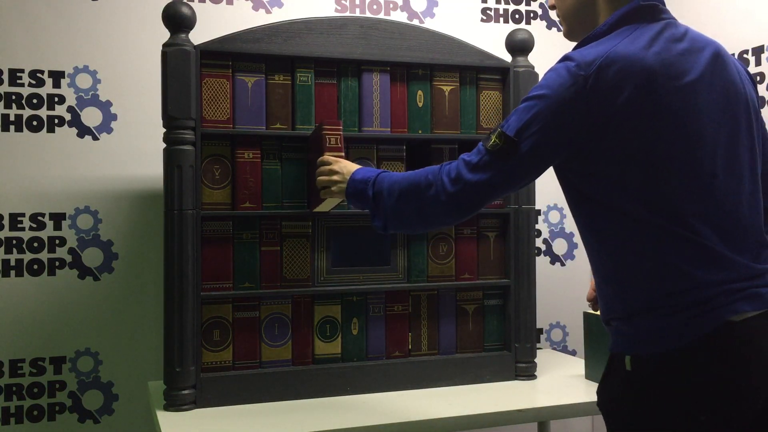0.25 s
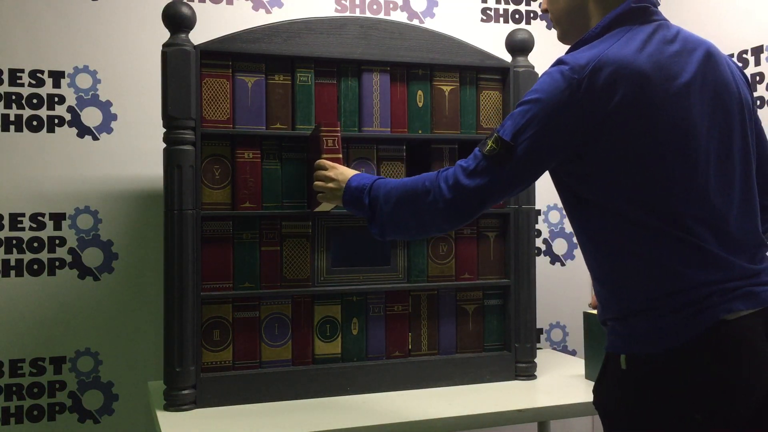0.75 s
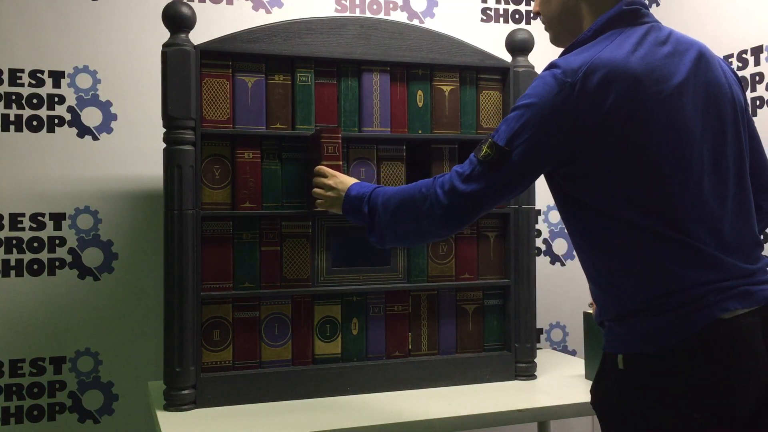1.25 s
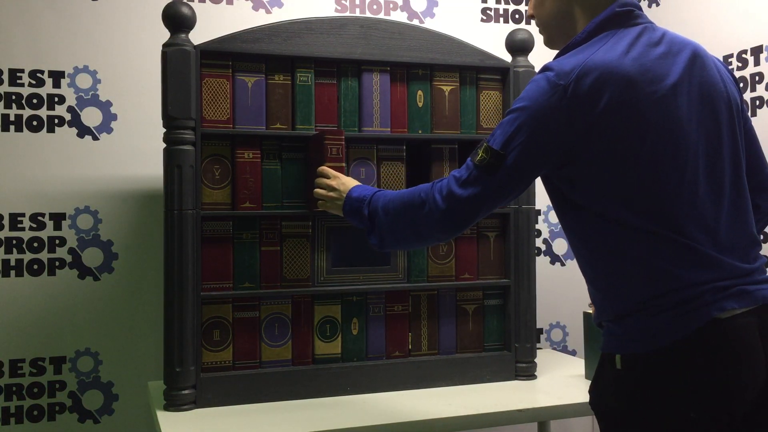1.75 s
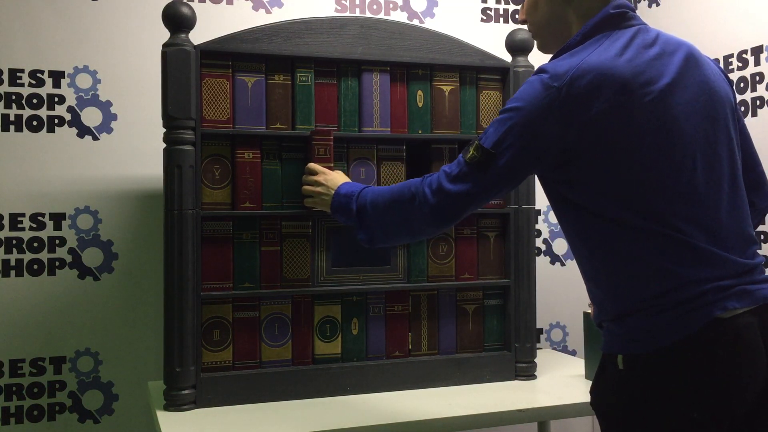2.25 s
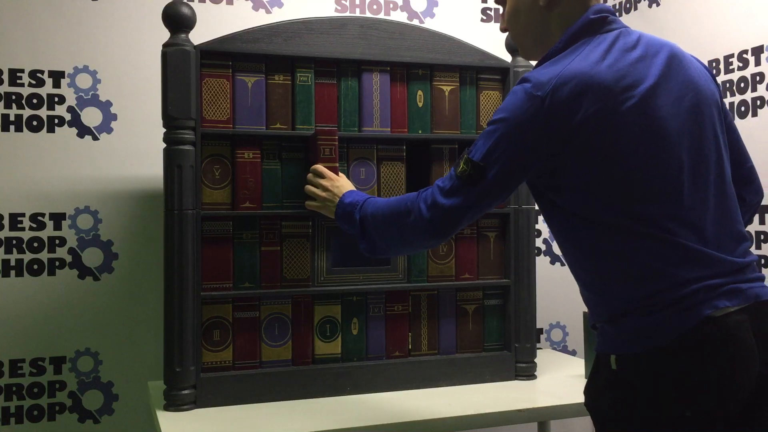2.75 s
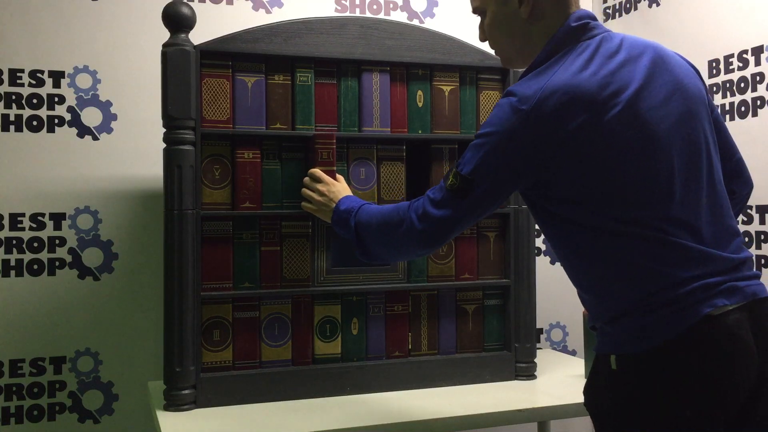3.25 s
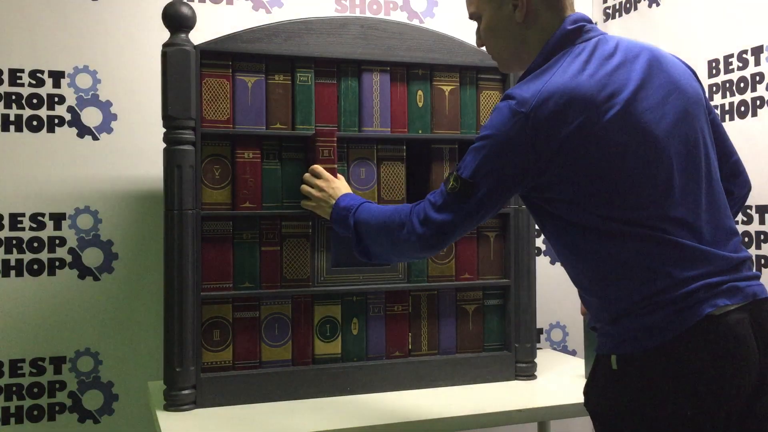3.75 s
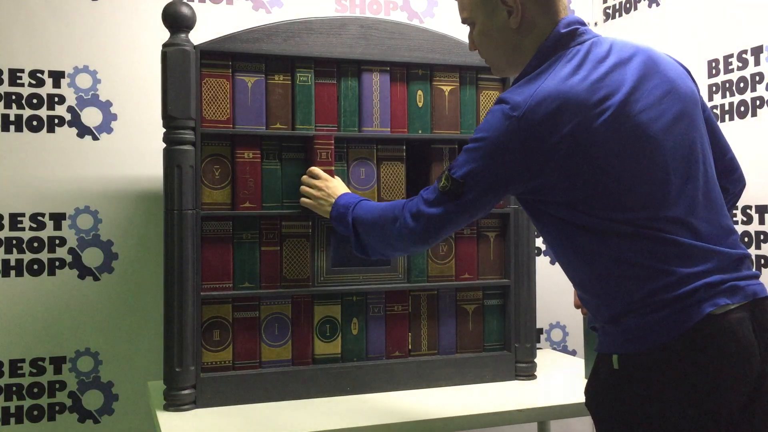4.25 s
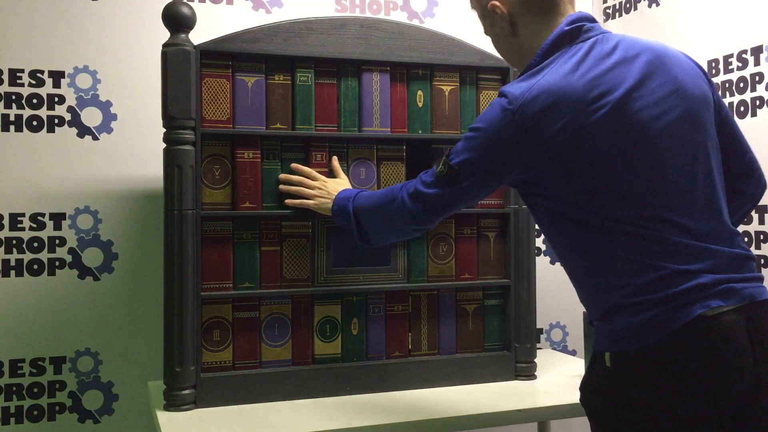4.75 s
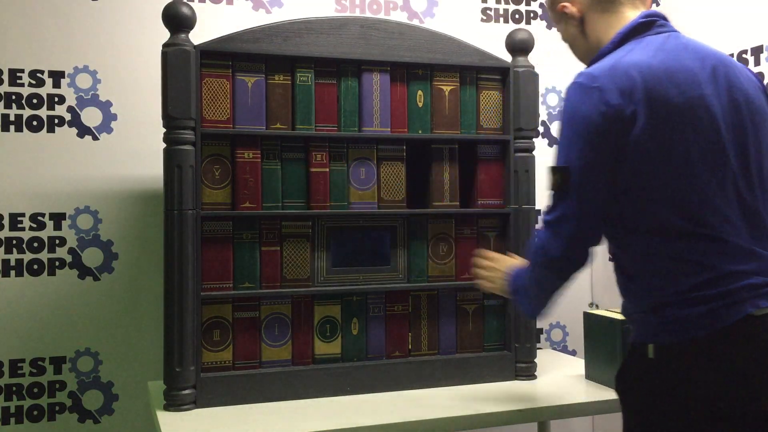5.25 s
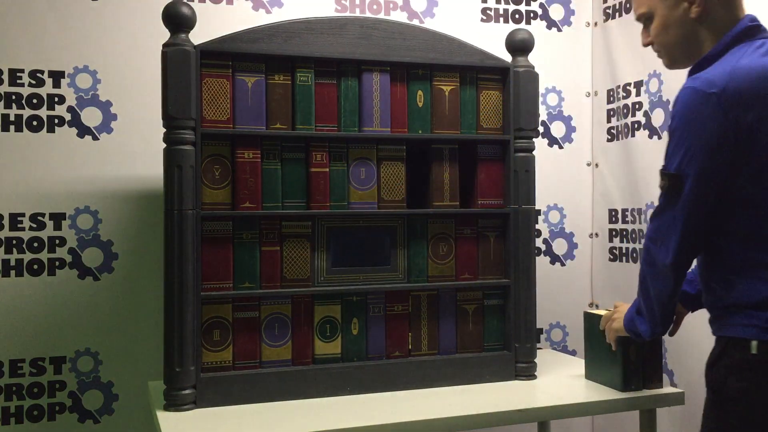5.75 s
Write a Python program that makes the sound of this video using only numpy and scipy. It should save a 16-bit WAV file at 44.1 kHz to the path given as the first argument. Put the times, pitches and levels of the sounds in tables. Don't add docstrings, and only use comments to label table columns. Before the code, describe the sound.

A close mono microphone in a bare, ringing room, with a faint low air floor. At about 0.15 s a heavy book knocks a wooden bookcase, followed at once by a deep hollow bump and a low table thud. A softer bump comes near 0.6 s, then a quiet gap. At 1.3 s a short scrape leads to a bright knock at 1.4 s and a small jerk around 1.6 s. Faint contacts near 2.0 s precede a hard, sharp clack at 2.4 s. Two light taps and a small rub come around 3.05-3.3 s, then another hard clack at 3.75 s. From 4.1 to 4.7 s the book slides home in rumbling, scraping jerks with hollow bumps and table sway, finished by a firm knock at 4.7 s. Echoes fade; a faint papery brush follows at 5.0-5.25 s. From 5.7 s a box drags with a drier, hissier scrape and bright little knocks near 5.9 s.

```python
import sys
import numpy as np
from scipy import signal
from scipy.fft import rfft, irfft
from scipy.io import wavfile
from scipy.ndimage import uniform_filter1d

SR = 44100
rng = np.random.default_rng(int(sys.argv[2]) if len(sys.argv) > 2 else 0)


def wav_out(sig):
    wavfile.write(sys.argv[1], SR, np.round(np.clip(np.atleast_2d(sig).T, -1, 1) * 32767).astype(np.int16))


def ratio(d):
    e = np.asarray(d, float) / 20
    return 10 ** e


N = 264159


def evened(x):
    return x / np.sqrt(np.mean(x ** 2) + 1e-20)


def read(points, hz, column=1):
    rows = np.transpose(points)
    return np.interp(np.log(hz + 1), np.log(rows[0] + 1), rows[column])


def add(mix, s, sound):
    part = mix[max(round(s * SR), 0):][:len(sound)]
    part += sound[:len(part)]


def coloured(x, spectrum):
    hz = np.fft.rfftfreq(len(x), 1 / SR)
    return evened(irfft(rfft(x) * ratio(read(spectrum, hz)), len(x)))


def passed(x, hz, order=2):
    return signal.sosfilt(signal.butter(order, hz, "high", fs=SR, output="sos"), x)


def ring(modes, widen=0.82):
    t = np.arange(6000) / SR
    tones = np.zeros(len(t))
    for hz, width, db in modes:
        tones += ratio(db) * width * np.exp(-np.pi * width * widen * t) * np.sin(2 * np.pi * hz * t)
    return tones / np.linalg.norm(tones)


def clatter(db, bright_db):
    # frequency in Hz, level in dB
    clack = [(60, -57), (150, 0), (350, 4), (800, -5), (1500, -14.5), (2500, -23.5), (4000, -34.5),
             (8000, -68)]
    hz = np.fft.rfftfreq(2048, 1 / SR)
    tilt_db = bright_db * np.log2(np.clip(hz, 300, 6000) / 900)
    log_colour = np.log(ratio(read(clack, hz) + tilt_db))
    fold = irfft(log_colour) * np.r_[1, 2 * np.ones(1023), 1, np.zeros(1023)]
    click = irfft(np.exp(rfft(fold)))
    return ratio(db) * click / np.linalg.norm(click)


def blows():
    # time in seconds, ring in dB, clatter in dB,
    # brightness in dB per octave, crack in dB
    hits = [
        (0.152, -13.5, -34.5, -5.5, -63),
        (1.408, -20.5, -27, 7.5, -64.5),
        (2.4326, -18, -13.5, 5.5, -59),
        (3.05, -27.5, -40, -2.5, -76),
        (3.077, -27, -39, 4.5, -89),
        (3.7637, -18, -15.5, 0.5, -57),
        (4.253, -29.5, -53, -11, -84),
        (4.713, -28, -15.5, 2, -61),
    ]
    # frequency in Hz, width in Hz, level in dB
    parts = [
        [(335, 940, -8.5), (600, 194, -5), (950, 790, -3.5), (1450, 330, -2), (2460, 370, -29)],
        [(315, 360, 5), (560, 320, 0.5), (640, 280, 0.5), (950, 89, -9.5), (1760, 2000, -20.5),
         (3030, 120, -21.5)],
        [(338, 200, -2.5), (700, 100, -8), (914, 25, -29.5), (992, 110, 9), (1575, 48, 0), (1592, 82, 1),
         (2384, 150, -14.5), (2866, 126, -11)],
        [(520, 36, 0), (700, 170, -1.5), (950, 25, 3)],
        [(330, 36, 31.5), (723, 140, 25.5), (980, 23, -6), (2200, 220, -29)],
        [(386, 240, -5), (694, 27.5, 8.5), (1138, 390, -3), (1370, 330, -24.5), (1960, 730, -14)],
        [(553, 52, 4.5), (900, 300, -1.5), (1230, 240, -3)],
        [(293, 93, 18), (416, 340, -4.5), (700, 93, 1.5), (1150, 63, 6.5), (2430, 270, -15)],
    ]
    # frequency in Hz, level in dB
    crack = [(1500, 1.5), (4000, 4.5), (7000, 4), (10000, -10), (13000, -9), (16000, -14.5)]
    mix, edges = np.zeros((2, N))
    fade = np.exp(-np.arange(1500) / SR / 0.0011)
    pad = signal.butter(2, 2600, fs=SR, output="sos")
    for (s, ring_db, clatter_db, bright_db, crack_db), modes in zip(hits, parts):
        wood = signal.sosfilt(pad, passed(ring(modes), 190))
        add(mix, s, ratio(ring_db + 15.5) * wood)
        add(mix, s, clatter(clatter_db + 4.5, bright_db))
        snap = fade * coloured(rng.standard_normal(len(fade)), crack)
        add(edges, s, ratio(crack_db + 13.5) * snap)
    return mix, edges


def slot(x):
    # delay in ms, share of the sound
    bounces = [(0, 0.35), (1.3, 0.72), (2.2, -0.054), (3.7, 0.61), (5.2, -0.33), (7.1, 0.045)]
    taps = np.zeros(600)
    for ms, share in bounces:
        taps[int(ms * SR / 1000)] += share
    return signal.oaconvolve(x, taps)[:N]


def bumps(rows):
    mix = np.zeros(N)
    k = np.arange(900)
    for s, hum_db, hz, ms, clatter_db in rows:
        bright_db = -4 + 5.5 * np.log2(hz / 500)
        u = np.arange(5000) / SR / (np.clip(ms, 6, 60) / 3000)
        waver = 1 + 0.025 * evened(uniform_filter1d(rng.standard_normal(len(u)), 250))
        hum = u * np.exp(1 - u) * np.sin(2 * np.pi * np.cumsum(hz * waver) / SR)
        add(mix, s - 0.002, ratio(hum_db - 7.5) * hum)
        smear = rng.standard_normal(900) * np.exp(-k / 200) * np.minimum(k / 50, 1)
        clack = clatter(clatter_db + 19.5, bright_db)
        add(mix, s, signal.fftconvolve(clack, smear / np.linalg.norm(smear)))
    return mix


def slides():
    # start in seconds, length in seconds,
    # rasp in dB, hiss in dB, swell from start to end in dB
    strokes = [(0.138, 0.032, -51, -66.5, 7.5), (3.753, 0.021, -48, -72.5, 7), (1.29, .11, -51, -74, 19.5),
               (2.25, 0.11, -61, -80.5, 1), (3.042, 0.05, -53.5, -75.5, -5.5),
               (3.106, 0.053, -56.5, -79, -3), (3.195, 0.074, -64.5, -77, 1), (3.445, .035, -61.5, -81, -4),
               (4.158, 0.106, -44, -74.5, 9), (4.236, .24, -44.5, -83.5, -3.5),
               (4.453, .265, -50.5, -73, 3.5), (5.017, 0.13, -83, -72, -5.5), (5.16, 0.099, -93.5, -70, 8),
               (5.69, 0.11, -50, -54.5, 24.5), (5.787, 0.12, -53.5, -51.5, 6.5),
               (5.883, .105, -52, -61, -13)]
    # time in seconds, level in dB
    jerks = [(.006, -59), (.145, -44.5), (2.048, -47), (1.31, -55), (1.37, -57), (1.405, -42.5),
             (1.586, -40.5), (1.619, -44), (2.361, -43.5), (2.423, -53), (3.104, -37), (3.25, -59.5),
             (4.15, -39), (4.261, -32.5), (4.325, -28.5), (4.53, -37), (4.61, -52), (4.682, -39),
             (5.784, -47.5), (5.9, -53)]
    # frequency in Hz, width in Hz, level in dB
    case = [(347, 100, -5), (695.4, 12, -5.5), (953, 56, -14)]
    # frequency in Hz, level in dB per Hz
    rasp_colour = [(530, 0), (900, -5.5), (1430, -11), (1620, -7.5), (2650, -21), (2870, -19),
                   (6140, -33.5), (8000, -61), (10400, -82), (17600, -120)]
    # frequency in Hz, level in dB per Hz
    hiss_colour = [(1470, -45), (2500, -2.5), (2760, -13.5), (2980, -5), (3270, -10.5), (3470, -10),
                   (6110, -11), (15500, -22.5)]
    grip_db_per_s, slip_db_per_s = 449, 207
    grit_per_s = 2500
    edge_share = 0.26

    t = np.arange(N) / SR
    slips, grit, fuzz, catch = rng.standard_normal((4, N))
    catch = ratio(2.4 * evened(uniform_filter1d(catch, 130)))
    grit = grit * (rng.random(N) < grit_per_s / SR)
    rumble, rasp, hiss = np.zeros((3, N))
    for s, db in jerks:
        drop_db = np.maximum(grip_db_per_s * (s - t), slip_db_per_s * (t - s))
        rumble = np.maximum(rumble, ratio(db - drop_db))
    for s, length, rasp_db, hiss_db, swell_db in strokes:
        u = np.linspace(0, 1, round(length * SR))
        swell = ratio(swell_db * (u - (swell_db > 0)))
        stroke = swell * signal.windows.tukey(len(u), edge_share)
        add(rasp, s, ratio(rasp_db) * stroke)
        add(hiss, s, ratio(hiss_db) * stroke)
    shaken = signal.fftconvolve(rumble * catch * slips, ring(case, widen=1.66))[:N]
    rasping = rasp * catch ** 1.8 * coloured(grit, rasp_colour)
    hissing = hiss * catch ** 1.7 * coloured(fuzz, hiss_colour)
    return ratio(-9.5) * shaken + ratio(-6.5) * rasping + ratio(-3.0) * hissing


def sways():
    # strongest swing in seconds, level in dB,
    # frequency in Hz, length in ms
    pushes = [(0.037, -45, 196, 8.8), (0.248, -36.5, 147, 90), (0.294, -31, 191, 10.5),
              (0.474, -43.5, 161, 24), (0.634, -44, 177, 70), (0.693, -37.5, 222, 11.3),
              (0.855, -49.5, 161.7, 26), (1.177, -48.5, 169, 26), (1.477, -40, 170.3, 97),
              (1.618, -44.5, 192, 48), (2.088, -41, 171, 16), (2.328, -48.5, 180, 22),
              (2.485, -42.5, 170, 45), (3.102, -43, 196, 62), (3.175, -43.5, 175, 38),
              (3.317, -50, 208, 24), (3.475, -51, 168.3, 45), (3.792, -43.5, 181.8, 72),
              (3.839, -35.5, 170, 11.4), (4.171, -37, 165.6, 26), (4.322, -31.5, 186, 5.3),
              (4.384, -35.5, 170, 18), (4.447, -40, 166.5, 83), (4.591, -33.5, 177.7, 43),
              (4.755, -42, 212.2, 97), (4.829, -47.5, 174, 52), (5.8, -40, 170, 32), (5.902, -46, 181, 31),
              (5.952, -44.5, 174, 17)]
    # frequency in Hz, level in dB
    legs = [(76, 3), (122, 6.5)]
    mix = np.zeros(N)
    t = np.arange(-0.08, 0.16, 1 / SR)
    lean = np.where(t < 0, 1.35, 0.8) * t
    for s, db, hz, ms in pushes:
        deep_db = db - 22.5 + 0.1433 * ms
        swing = np.exp(-(1500 * lean / ms) ** 2) * np.sin(2 * np.pi * hz * t)
        shake = sum(ratio(d) * np.sin(2 * np.pi * (f * t + rng.random())) for f, d in legs)
        shake = np.exp(-(lean / 0.042) ** 2) * shake
        skip = max(round((0.08 - s) * SR), 0)
        add(mix, s - 0.08, (ratio(db - 1.0) * swing + ratio(deep_db - 8.0) * shake)[skip:])
    return mix


def room(x):
    # frequency in Hz, t60 in seconds, build-up in seconds, early burst in dB
    bands = [(72.5, 0.21, 0.15, -6), (170, 1.33, 0.021, 2), (400, 1.39, 0.0091, 13.5),
             (1000, 1.534, 0.014, 14.5), (1730, 1.21, 0.00063, 11), (2860, 1.28, 0.0013, 9.5),
             (5600, 0.31, 0.0019, 13), (10000, 0.29, 0.0025, 11)]
    size, out = 60000, np.zeros(N)
    hz, t = np.fft.rfftfreq(size, 1 / SR), np.arange(size) / SR
    for place in range(3):
        taps, tail = np.zeros((2, size))
        spots = np.arange(0, size, 15) + rng.integers(0, 15, size // 15)
        taps[spots] = rng.choice([-1., 1.], size // 15)
        for k, (_, t60, rise, early_db) in enumerate(bands):
            share = read([(row[0], j == k) for j, row in enumerate(bands)], hz)
            build = 1 - np.exp(-(t / rise) ** 2)
            early = 1 + (ratio(early_db) - 1) * np.exp(-(t / 0.03) ** 2)
            tail += irfft(rfft(taps) * share, size) * build * early * ratio(-60 * t / t60)
        turn = np.sqrt(2 / 3) * np.cos(2 * np.pi * (np.arange(N) / SR * 9 + place / 3))
        out += signal.fftconvolve(x * turn, tail / np.linalg.norm(tail))[:N]
    return out


def air():
    # frequency in Hz, level in dB per Hz
    still = [(15, -44.5), (25, -15), (107, -0.5), (188, -11.5), (457, -14.5), (762, -19.5), (848, -19),
             (1200, -24.5), (1380, -24.5), (1490, -23), (1620, -24), (1900, -22.5), (2060, -24),
             (3630, -26), (15500, -36.5)]
    frames, hz = N // 256 + 5, np.fft.rfftfreq(1024, 1 / SR)
    a, b, patches = rng.standard_normal((frames, 513, 3)).T
    patches = evened(uniform_filter1d(uniform_filter1d(patches, 12, 0), 14, 1))
    z = (a + 1j * b) * ratio(read(still, hz)[:, None] + 0.31 * patches)
    return ratio(-65) * evened(signal.istft(z, nperseg=1024, noverlap=768)[1][:N])


def scene():
    # time in seconds, hum in dB,
    # panel frequency in Hz, hum length in ms, clatter in dB; the next two tables have the same columns
    soft_bumps = [(0.043, -40.5, 363, 9.7, -80), (0.179, -30.5, 755, 7.9, -30),
                  (0.194, -17, 303.7, 22, -32.5), (0.602, -34.5, 584, 16, -33),
                  (1.13, -56.5, 491, 41, -49.5), (1.316, -55, 1310, 27, -55.5),
                  (1.343, -47.5, 479, 16, -63.5), (1.442, -25, 485, 11.3, -49), (1.583, -35, 465, 18, -59),
                  (2.033, -52, 280, 5.9, -38), (3.229, -39, 379, 30, -52), (4.101, -36.5, 375, 24, -33),
                  (4.315, -20.5, 380, 30, -37.5), (4.389, -35, 377, 25, -43),
                  (4.476, -34.5, 383, 72, -29.5), (4.515, -34, 900, 6.7, -37.5), (4.534, -36, 700, 6, -26),
                  (4.556, -47, 790, 13.5, -56), (4.719, -29.5, 333, 20, -24)]
    touches = [(.012, -52.5, 520, 51, -53.5), (1.59, -47, 700, 36, -50), (2.35, -38.5, 746, 25, -46.5),
               (2.354, -30.5, 568, 25, -59), (3.056, -51, 1630, 13, -55), (3.085, -43, 1570, 14, -60),
               (.603, -38, 400, 30, -51), (2.04, -48.5, 565, 25, -47), (2.222, -47.5, 816, 24, -59.5),
               (3.30, -50, 900, 40, -48.5), (3.451, -37.5, 902, 13, -56.5)]
    box_knocks = [
        (5.757, -48, 690, 16, -68),
        (5.774, -48.5, 1465, 41, -48),
        (5.778, -38.5, 400, 12, -50),
        (5.888, -33, 2104, 19, -40.5),
        (5.890, -39, 950, 13, -63),
        (5.901, -31, 2060, 8.3, -37.5),
        (5.903, -39.5, 880, 17, -59),
        (5.914, -41, 900, 9.4, -48),
        (5.93, -46, 1970, 10, -47),
    ]
    hard, edges = blows()
    soft = bumps(soft_bumps) + slides()
    near = bumps(touches)
    box = bumps(box_knocks)
    low = sways()
    to_walls = ratio(-3.5) * edges + ratio(4.5) * hard + ratio(0.5) * soft
    to_walls += ratio(-8.5) * near + ratio(-6.5) * box + ratio(-1.5) * low
    direct = slot(hard + edges) + soft + near + box + low
    return passed(direct + room(to_walls), 71, order=3)[None] + passed(air(), 53)[None]


def band_limit(x):
    return signal.sosfilt(signal.butter(12, 15660, fs=SR, output="sos"), x)


def record(dry):
    depth_db, from_db, span_db = 5, 3, 12.5
    z = signal.stft(dry, nperseg=512, noverlap=384)[2]
    power = uniform_filter1d(uniform_filter1d(abs(z) ** 2, size=9, axis=1), size=9, axis=2)
    power_db = 10 * np.log10(power + 1e-16)
    over_db = power_db - np.percentile(power_db, 12, axis=2, keepdims=True)
    z = z * ratio(-depth_db * np.clip(1 - (over_db - from_db) / span_db, 0, 1))
    clean = signal.istft(z, nperseg=512, noverlap=384)[1][:, :N]
    return band_limit(clean)


dry = scene()
out = record(dry)
wav_out(out)
```